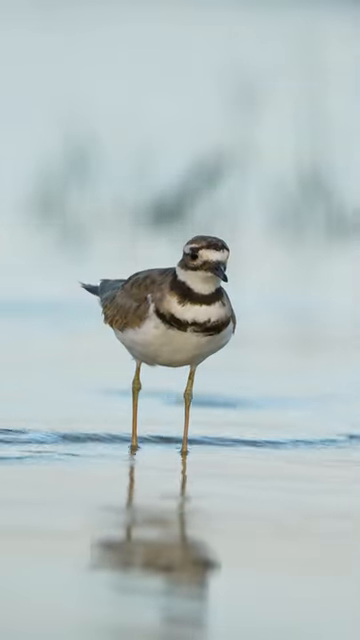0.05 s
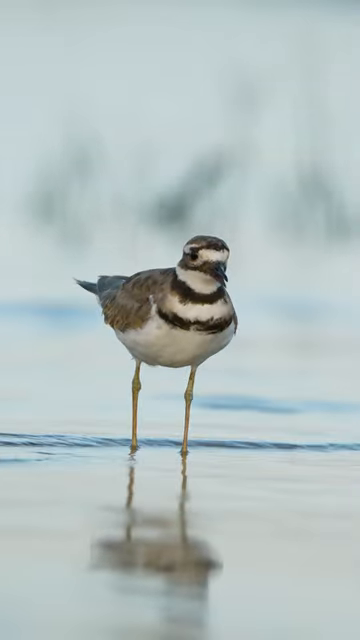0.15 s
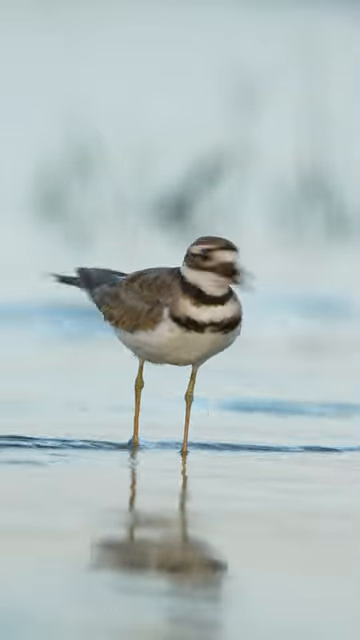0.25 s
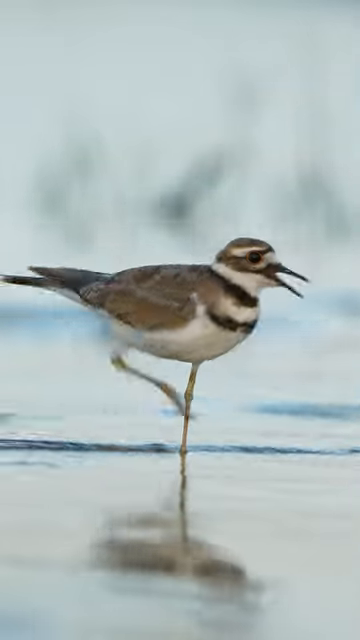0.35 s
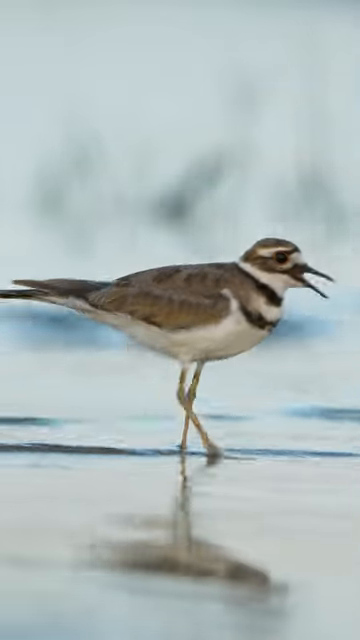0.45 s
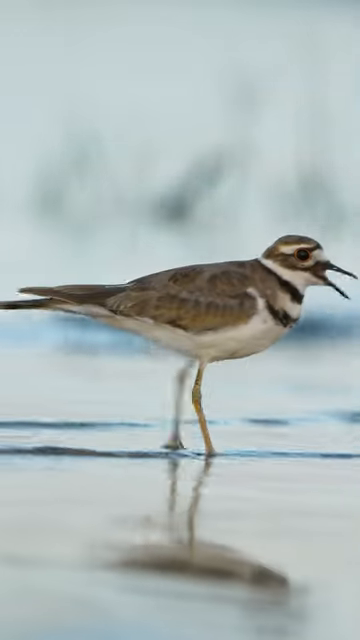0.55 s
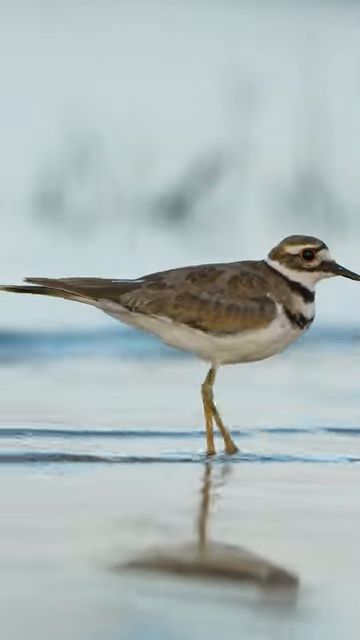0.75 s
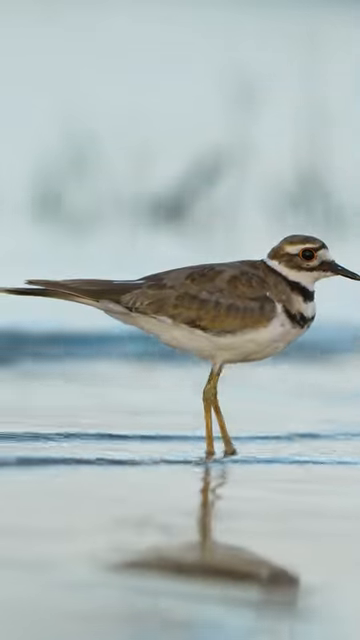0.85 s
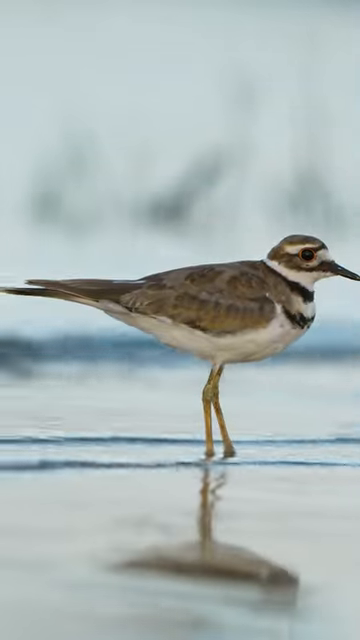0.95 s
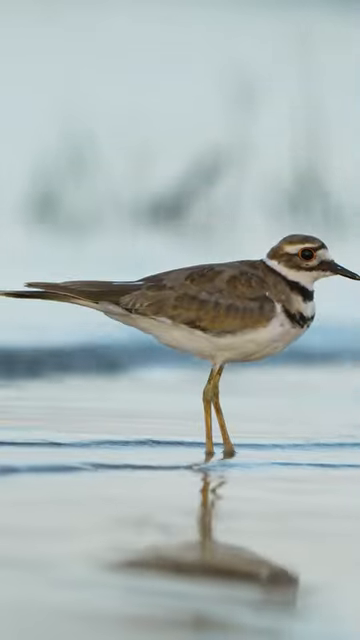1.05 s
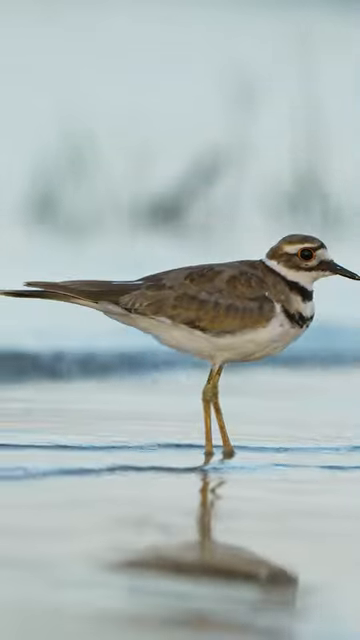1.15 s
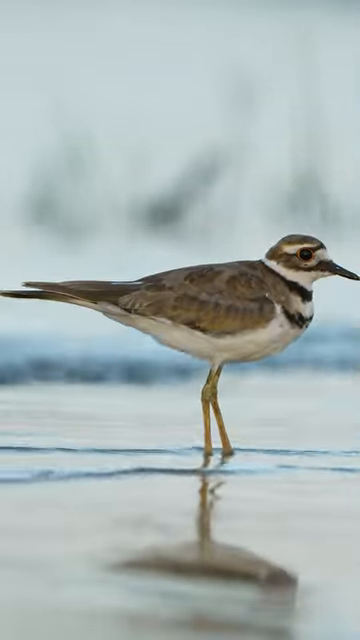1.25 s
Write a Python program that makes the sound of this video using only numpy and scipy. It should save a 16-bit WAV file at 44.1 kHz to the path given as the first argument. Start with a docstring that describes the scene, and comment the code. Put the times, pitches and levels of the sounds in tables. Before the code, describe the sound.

A killdeer close by gives one loud, piercing two-part whistle on a quiet watery shore.

```python
"""Soft outdoor air, microphone hiss and a low hum lie under very faint, blurred whistles on a shore.
A killdeer close by gives one loud call, a quick fluttering arch and then a long, clean rising note: its
throat favours the second harmonic, and the ground and a far bank return weak echoes.
Small plips of water follow from midway through the note, as wobbling tones that die away.
Near the end a fainter bird starts the same call, a small tick sounds and a soft rush of noise swells."""
import sys
import numpy as np
from scipy import signal
from scipy.fft import rfft, irfft
from scipy.io import wavfile
from scipy.ndimage import uniform_filter1d, map_coordinates

SR = 44100
rng = np.random.default_rng(int(sys.argv[2]) if len(sys.argv) > 2 else 0)


def generate_wav(signal):
    """Clip the signal to [-1, 1] and save it as 16-bit WAV at the path in sys.argv[1]."""
    frames = np.transpose(np.atleast_2d(signal))
    scaled = np.clip(frames, -1, 1) * 32767
    pcm = np.round(scaled).astype(np.int16)
    wavfile.write(sys.argv[1], SR, pcm)


N = 57330
LOW_PARTIAL_TOP_HZ = 3020  # splits the syrinx's low partial from the whistle an octave above


def undb(db):
    """Decibels to amplitude gain."""
    return 10 ** (np.asarray(db) / 20)


def curve(rows, column=1):
    """One column of a timed table, joined by straight lines."""
    rows = np.array(rows)
    return np.interp(np.arange(N) / SR, rows[:, 0], rows[:, column])


def walk(rate):
    """Smooth random wander of spread 1: noise averaged twice over 1/rate seconds."""
    k = max(int(SR / rate), 2)
    smooth = uniform_filter1d(rng.standard_normal(N), k, mode="wrap")
    smooth = uniform_filter1d(smooth, k, mode="wrap")
    return (smooth - smooth.mean()) / smooth.std()


def noise(colour):
    """Noise of rms 1 with the spectral shape of (Hz, relative dB) points."""
    points = np.array(colour)
    f = np.fft.rfftfreq(N, 1 / SR)
    shape_db = np.interp(np.log(f + 1), np.log(points[:, 0]), points[:, 1])
    shaped = irfft(rfft(rng.standard_normal(N)) * undb(shape_db), N)
    return shaped / shaped.std()


def band(hz, width):
    """A narrow, bell-shaped band of noise of rms 1."""
    f = np.fft.rfftfreq(N, 1 / SR)
    bell = np.exp(-(2 * (f - hz) / width) ** 2)
    narrow = irfft(rfft(rng.standard_normal(N)) * bell, N)
    return narrow / narrow.std()


def swell(centre, length):
    """A bell-shaped rise and fall, times in seconds."""
    return np.exp(-(2 * (np.arange(N) / SR - centre) / length) ** 2)


def place(x, pan_db):
    """Share a sound between left and right (left minus right in dB), keeping the level of their mean."""
    g = undb(pan_db)
    return np.array([x * 2 * g / (1 + g), x * 2 / (1 + g)])


def hiss():
    """High microphone hiss: independent noise on each side that flickers, stronger on the right."""
    # hiss colour: f/Hz, relative density/dB
    hiss_colour = [(3000, -35), (6000, -15.5), (7800, -9.5), (9400, 1), (10600, 1.5), (12000, -4.5),
                   (13500, -7), (16000, -10)]
    flicker_db, flicker_hz = 2, 65
    sides = []
    for level_db in (-61, -46.5):  # left, right
        gain = undb(level_db + flicker_db * walk(flicker_hz))
        sides.append(gain * noise(hiss_colour))
    return np.array(sides)


def air():
    """Outdoor air: coloured noise, central in the bass and wide above."""
    # air colour: f/Hz, relative density/dB
    air_colour = [(25, -37), (60, -27), (85, -11), (120, 3), (200, 1), (270, -0.5), (400, -10), (600, -14),
                  (1400, -15), (2500, -24), (3600, -28), (5000, -22), (9000, -19.5), (16000, -29)]
    mid_db, swell_db, swell_hz = -56, .8, 25
    wide_hz = 507  # the side noise is at half strength here
    f = np.fft.rfftfreq(N, 1 / SR)
    width = f ** 2 / (f ** 2 + wide_hz ** 2)
    side = irfft(rfft(noise(air_colour)) * width, N)
    gain = undb(mid_db + swell_db * walk(swell_hz))
    return gain * (noise(air_colour) + np.array([side, -side]))


def hum():
    """Low sine tones that waver a little in pitch and level, the same on both sides."""
    # hum tones: f/Hz, rms level/dB
    hum_tones = [(138.5, -54), (175.5, -63.5)]
    pitch_waver, level_waver_db = .008, .8  # pitch as a share of 1
    out = np.zeros(N)
    for hz, db in hum_tones:
        phase = 2 * np.pi * np.cumsum(hz * (1 + pitch_waver * walk(12))) / SR
        out += np.sqrt(2) * undb(db + level_waver_db * walk(23)) * np.sin(phase)
    return out


def faint_whistle():
    """Patchy, blurred bands of noise, probably birds much further off, different on each side."""
    # faint whistles: centre t/s, length/s, f/Hz, width/Hz, level/dB
    faint_whistles = [(0.115, .02, 4600, 159, -65.5), (0.17, .05, 4600, 258, -64.5),
                      (0.228, .03, 4540, 148, -48), (0.694, .06, 4640, 503, -57.5),
                      (.98, .11, 4660, 493.4, -65)]
    out = np.zeros((2, N))
    for centre, length, hz, width, db in faint_whistles:
        sides = np.array([band(hz, width), band(hz, width)])
        out += undb(db) * swell(centre, length) * sides
    return out


def rush():
    """Resonant, uneven noise, perhaps a wavelet running in, swells at the end, stronger on the left."""
    # rush colour ahead of the resonances: f/Hz, relative density/dB
    rush_colour = [(100, -21), (300, -0.5), (1000, 1), (1700, 0), (2500, -7.5), (6000, -46)]
    # resonances in the rush: f/Hz, width/Hz, boost/dB
    rush_peaks = [(420, 100, 5), (1010, 68, -1), (1660, 230, 6.5)]
    start_s, full_s, level_db = 1.12, 1.28, -53  # level ahead of the resonances
    f = np.fft.rfftfreq(N, 1 / SR)
    boost_db = sum(db / (1 + (2 * (f - hz) / width) ** 2) for hz, width, db in rush_peaks)
    resonance = undb(boost_db)
    sides = np.array([irfft(rfft(noise(rush_colour)) * resonance, N) * undb(db) for db in (0, -6)])
    flutter_db = 1.5 * walk(70)
    return undb(level_db + flutter_db) * curve([(start_s, 0), (full_s, 1)]) * sides


def plips():
    """Small bubbles in the shallows ring briefly, wobble and glide upward."""
    # plips: start t/s, starting f/Hz, amplitude ahead of the envelope/dB, decay/s, left minus right/dB
    plip_rows = [(.44, 662, -51.5, 0.015, 3), (0.814, 1725, -51, 0.011, 14), (0.914, 855, -53, 0.011, 1),
                 (.998, 1643, -55, .012, 8.5), (1.051, 1750, -57, 0.022, 1.5), (1.131, 675, -56, 0.032, 8),
                 (1.19, 1100, -55, 0.015, 16), (1.243, 1746, -54, 0.018, 16), (1.247, 309, -54, 0.017, -6),
                 (1.258, 1140, -56, .016, 9), (1.274, 1610, -57, 0.013, 11), (1.272, 380, -53.5, .025, 4),
                 (1.277, 987, -53, 0.024, 12)]
    attack_s, glide_per_s, wobble = .004, 1.2, .012  # glide and wobble as shares of the pitch
    out = np.zeros((2, N))
    for start, hz, db, decay, pan_db in plip_rows:
        age = np.maximum(np.arange(N) / SR - start, 0)
        pitch = hz * (1 + glide_per_s * age + wobble * walk(150))
        ring = np.sin(2 * np.pi * np.cumsum(pitch) / SR)
        envelope = (1 - np.exp(-age / attack_s)) * np.exp(-age / decay)
        out += place(undb(db) * ring * envelope, pan_db)
    return out


def tick():
    """One short, ragged tick of narrow noise in the water, perhaps a drop landing."""
    burst = swell(centre=1.097, length=.007) * band(hz=2330, width=600)
    return place(undb(-55.5) * burst, pan_db=2.3)


def echo(x, t60, delay):
    """Scattered reflections as decaying noise of unit energy, different on each side; times in seconds."""
    t = np.arange(N) / SR
    response = rng.standard_normal((2, N)) * np.exp(-np.log(1000) * t / t60) * (t > delay)
    response /= np.sqrt(np.sum(response ** 2, axis=1, keepdims=True))
    return signal.fftconvolve(x[None], response, axes=1)[:, :N]


def shore(x):
    """Quick, bright returns from the ground; a duller echo from a far bank and a faint tail."""
    ground_db, ground_t60_s, tail_db, tail_t60_s = -22, .14, -37, .7
    bank_delay_s, bank_db = .172, -48
    treble_db, treble_hz = 14, 6400  # the ground returns the overtones more strongly than the whistle
    low_db = 9.5  # the low partial spreads wider than the whistle, so more of it comes back
    f = np.fft.rfftfreq(2 * N, 1 / SR)
    spectrum = rfft(x, 2 * N)
    low_boost = undb(low_db / (1 + (f / LOW_PARTIAL_TOP_HZ) ** 10))
    treble_boost = undb(treble_db * (1 - 1 / (1 + (f / treble_hz) ** 10)))
    dull = irfft(spectrum * low_boost)[:N]
    bright = irfft(spectrum * treble_boost)[:N]
    delayed = np.interp(np.arange(N) - bank_delay_s * SR, np.arange(N), dull, left=0)
    bank = undb(bank_db) * echo(delayed, 0.013, delay=0)
    tail = undb(tail_db) * echo(dull, tail_t60_s, delay=0.014)
    ground = undb(ground_db) * echo(bright, ground_t60_s, delay=0.0057)
    return ground + bank + tail


def call(whistle_hz, level_db, start, end, overtones_db):
    """The syrinx sounds an octave under the whistle; the throat passes harmonic 2 and damps the others."""
    # throat response to the other harmonics: f/Hz, level beside the whistle/dB
    throat_rows = np.array([(1950, -19), (2120, -23), (2350, -21.5), (5900, -40), (6400, -31.5),
                            (7000, -29.5), (8200, -36.5), (8800, -41), (9300, -33), (11000, -54),
                            (12400, -37), (13300, -33.5), (14200, -35.5), (14700, -41), (15500, -38.5)])
    # rasp colour while the voice is rough: f/Hz, relative density/dB
    rasp_colour = [(1500, -28), (3000, -15), (4300, -6), (5000, 7.5), (5500, -1.5), (6000, -10.5),
                   (9000, -9.5), (15000, -11)]
    rasp_db, overtone_waver_db, shimmer_db = -32, 2.5, .25
    attack_s, release_s = 0.0034, 0.005
    rough_after_s, rough_width_s = 0.014, 0.018  # roughness as the voice drops from the top of the arch
    jitter, rough_jitter, rough_rate_hz = .0004, 0.0033, 1400  # jitters as shares of the pitch
    # fast flutter of loudness and pitch in the arch; all but the rate are shares of 1
    flutter_hz, flutter_scatter, flutter_depth, flutter_pitch = 270, .1, .13, .005

    t = np.arange(N) / SR
    rough = np.exp(-((t - start - rough_after_s) / rough_width_s) ** 2)
    flutter_rate = flutter_hz * (1 + flutter_scatter * walk(200))
    flutter = rough * np.cos(2 * np.pi * np.cumsum(flutter_rate) / SR)
    wander = jitter * walk(200) + flutter_pitch * flutter + rough_jitter * rough * walk(rough_rate_hz)
    f0 = whistle_hz / 2 * (1 + wander)
    phase = 2 * np.pi * np.cumsum(f0) / SR
    voice = np.sin(2 * phase) + undb(rasp_db) * rough * noise(rasp_colour)
    for k in (1, 3, 4, 5, 6, 7):
        throat_db = np.interp(np.log(k * f0), np.log(throat_rows[:, 0]), throat_rows[:, 1])
        waver_db = overtone_waver_db * min(k / 5, 1) * (walk(140) + rough * walk(430))
        voice = voice + undb(throat_db + overtones_db + waver_db) * np.sin(k * phase)
    ramp = np.clip((t - start) / attack_s, 0, 1) * np.clip((end - t) / release_s, 0, 1)
    gate = np.sin(np.pi / 2 * ramp) ** 2
    loudness = (1 + flutter_depth * flutter) * undb(level_db + shimmer_db * walk(70))
    return np.sqrt(2) * voice * gate * loudness


def far_bird():
    """The faint answer: the same syrinx and throat with weaker overtones, and stronger echoes."""
    # arch, then the start of the long note: t/s, whistle f/Hz, level ahead of the trim/dB
    far_arch = [(1.034, 4620, -37.5), (1.039, 4893, -41), (1.046, 4840, -39.5), (1.057, 4780, -32),
                (1.066, 4560, -42), (1.077, 4235, -48.5), (1.088, 4200, -61)]
    far_note = [(1.1, 4250, -62), (1.118, 4273, -53), (1.19, 4314, -52), (1.29, 4354, -50)]
    trim_db, echo_db = -2.5, 3
    rows = list(far_arch) + list(far_note)
    level_db = curve(rows, column=2) + trim_db
    # the note is still sounding when the scene stops
    voice = call(curve(rows), level_db, start=1.033, end=1.4, overtones_db=-4)
    return place(voice, pan_db=4.5) + undb(echo_db) * shore(voice)


def near_bird():
    """The loud call: the whistle shifts between left and right, the low partial stays central."""
    # pitch of the whistle (second harmonic) in the arch and the long note: t/s, f/Hz
    arch_pitch = [(.227, 4257), (.232, 4650), (.239, 4711), (.247, 4655), (.256, 4370), (.263, 4014),
                  (.269, 3923), (.277, 3922)]
    note_pitch = [(.287, 3968), (.302, 4045), (.326, 4140), (.362, 4158), (.389, 4202), (.405, 4206),
                  (.445, 4308), (.468, 4325), (.482, 4363), (.51, 4348), (.533, 4391), (.546, 4380),
                  (.56, 4448), (.573, 4420), (.595, 4524), (.622, 4553), (.633, 4480), (.641, 4308)]
    # level of the whistle in the arch and the long note: t/s, level/dB
    arch_level = [(.228, -19.5), (.232, -13.5), (.241, -9), (.248, -10), (.257, -13), (.2625, -16.5),
                  (.267, -17)]
    note_level = [(.284, -18), (.308, -17.5), (.335, -19), (.38, -19.5), (.408, -21), (.427, -16.5),
                  (.448, -14.5), (.465, -16), (.505, -15), (.543, -16), (.56, -15.2), (.597, -15),
                  (.628, -12), (.639, -18)]
    # place between the ears: t/s, left minus right/dB
    pan_rows = [(.228, -3), (.238, 7.5), (.255, -6.5), (.264, 0), (.29, -0.5), (.405, 6), (.445, -1.8),
                (.52, -1), (.575, -4.5), (.635, -2)]
    # lag of the right side behind the left as the bird turns: t/s, lag/ms
    lag_rows = [(.36, 0.0076), (.43, -0.018), (.56, -0.008), (.61, 0.021)]

    pitch = curve(list(arch_pitch) + list(note_pitch))
    level_db = curve(list(arch_level) + list(note_level))
    flare_db = 5.5 * swell(centre=0.256, length=0.0065)  # overtones flare as the arch turns down
    voice = call(pitch, level_db, start=.2258, end=.6428, overtones_db=flare_db)
    lowpass = signal.butter(6, LOW_PARTIAL_TOP_HZ, fs=SR, output="sos")
    low = signal.sosfiltfilt(lowpass, voice)
    left, right = place(voice - low, curve(pan_rows))
    lag_samples = curve(lag_rows) * SR / 1000
    right = map_coordinates(right, [np.arange(N) - lag_samples], order=3)
    return low + np.array([left, right]) + shore(voice)


def scene():
    """The birds over the quiet shore."""
    background = hiss() + air() + hum() + faint_whistle()
    water = rush() + plips() + tick()
    return background + water + far_bird() + near_bird()


def record(dry):
    """The recorder cuts the top with a steep elliptic low-pass."""
    top_hz = 15900
    lowpass = signal.ellip(10, .1, 80, top_hz, fs=SR, output="sos")  # .1 dB ripple, 80 dB stopband
    return signal.sosfilt(lowpass, dry)


dry = scene()
out = record(dry)
generate_wav(out)
```